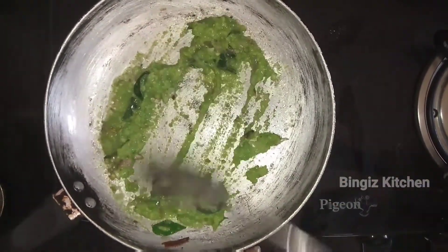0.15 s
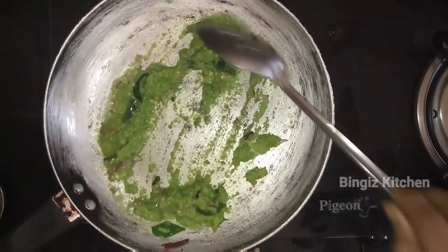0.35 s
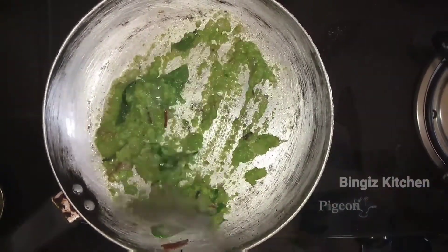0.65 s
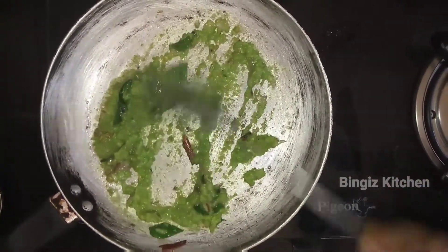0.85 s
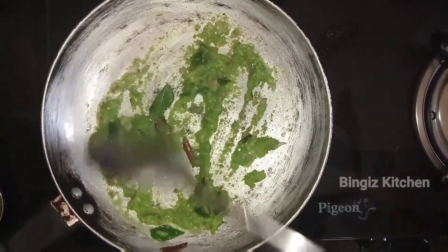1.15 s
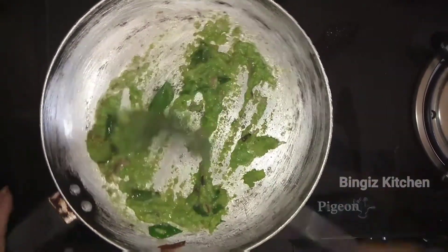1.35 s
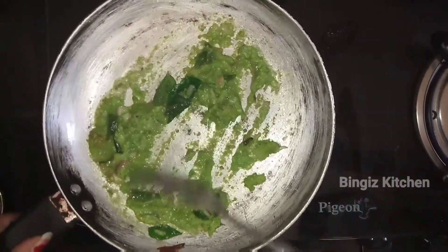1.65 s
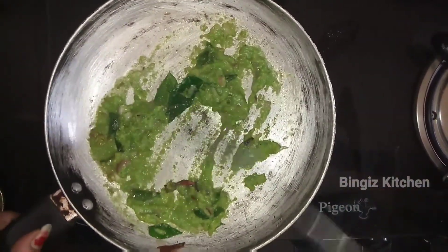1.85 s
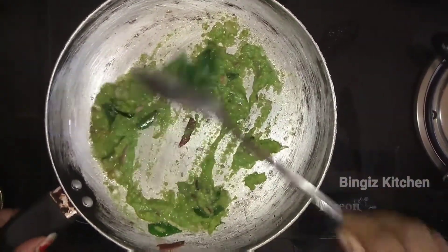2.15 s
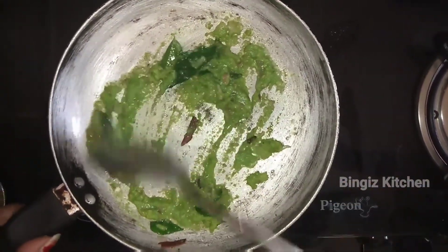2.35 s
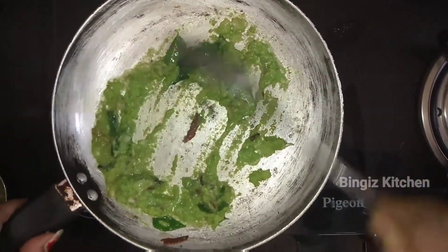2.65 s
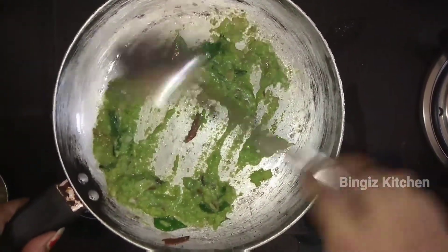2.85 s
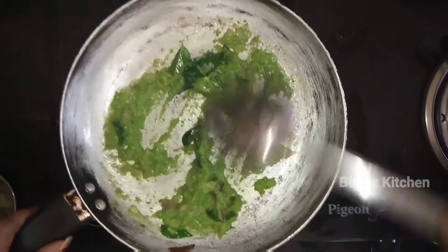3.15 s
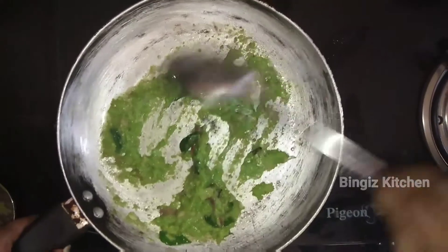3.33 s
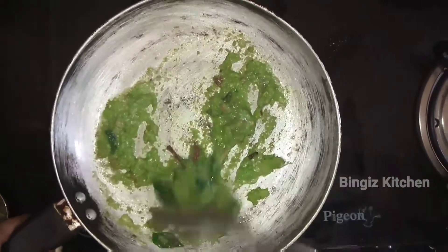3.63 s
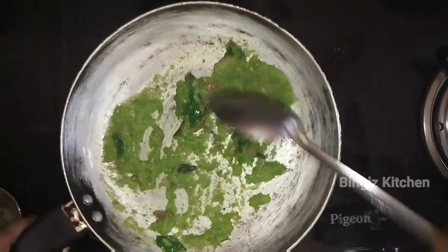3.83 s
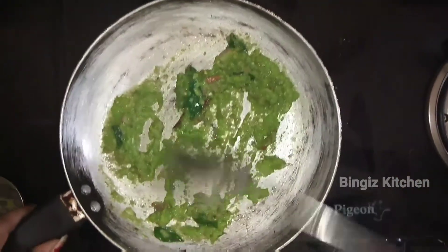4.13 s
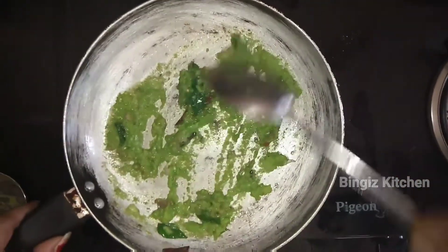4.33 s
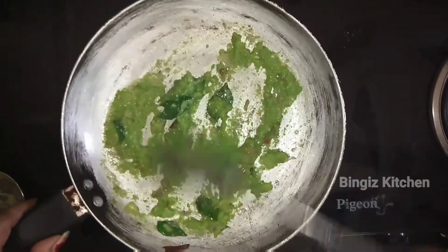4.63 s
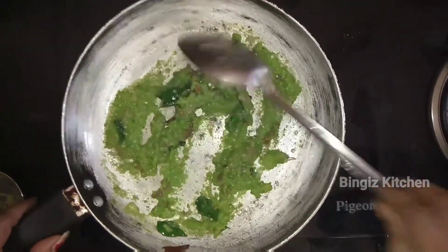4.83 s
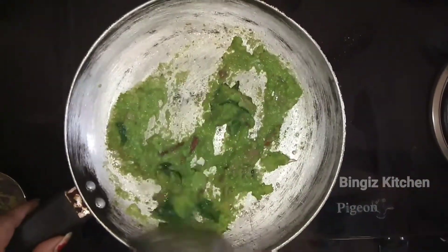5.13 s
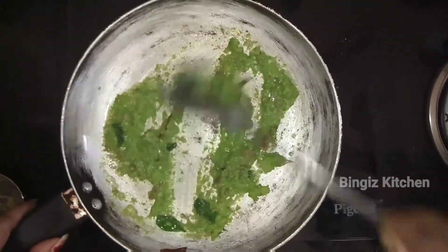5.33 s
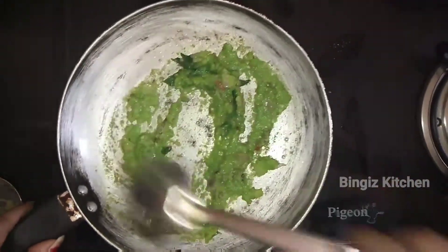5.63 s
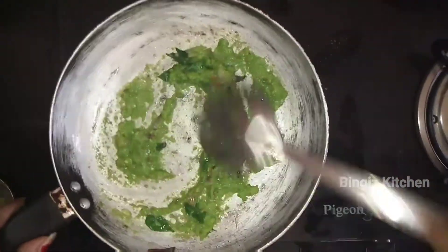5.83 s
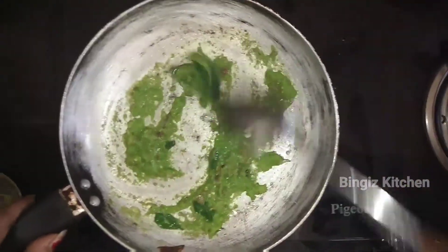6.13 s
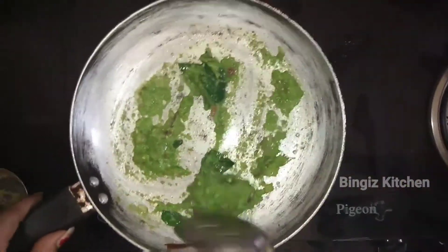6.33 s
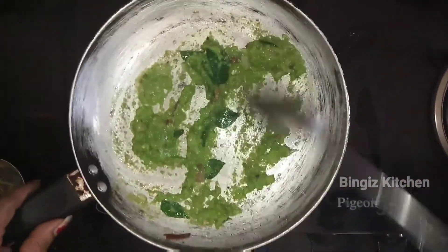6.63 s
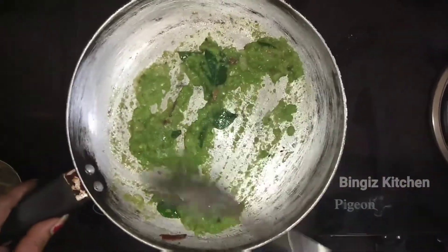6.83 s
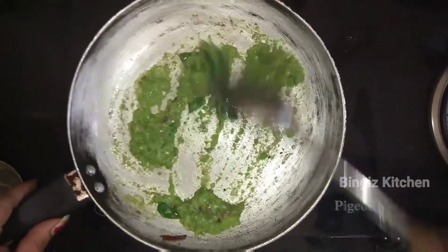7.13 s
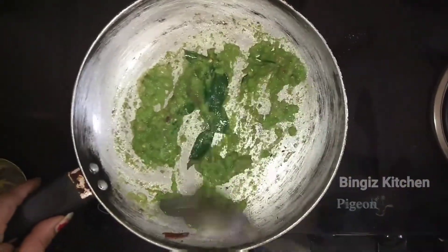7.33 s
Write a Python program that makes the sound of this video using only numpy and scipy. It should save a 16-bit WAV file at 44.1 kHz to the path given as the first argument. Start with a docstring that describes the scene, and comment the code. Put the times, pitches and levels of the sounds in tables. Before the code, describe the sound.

Close by in a quiet kitchen, a fine crackling sizzle runs throughout. Soft pan bumps and hollow little plops come first; then spoon knocks and rasping strokes arrive several times a second, unevenly, some sharp and clangy, others cushioned by paste. Scrapes grow longer and more ringing around three seconds and after five and a half. Low thuds accompany the contacts; stereo, nearly dry, with only slight room reflection.

```python
"""Paste sizzles softly throughout, over a low thud and a few plops; then a steel spoon stirs it, close by.
Three or four times a second the spoon knocks on the aluminium frying pan, chatters and drags across it.
Knocks and pushes ring damped pan modes and thud the pan on the stove; random slips make the scrapes;
bursts of noise and short chirps make the sizzle; decaying sines make the plops of air in the paste."""
import sys
import numpy as np
from scipy import signal
from scipy.fft import rfft, irfft, next_fast_len
from scipy.io import wavfile
from scipy.ndimage import uniform_filter1d

SR = 44100
rng = np.random.default_rng(int(sys.argv[2]) if len(sys.argv) > 2 else 0)


def dump(signal):
    """Clip the signal to [-1, 1] and save it as 16-bit WAV at the path in sys.argv[1]."""
    limited = np.clip(np.atleast_2d(signal).T, -1, 1)
    pcm = np.round(limited * 32767).astype(np.int16)
    wavfile.write(sys.argv[1], SR, pcm)


N = 329427
TIME = np.arange(N) / SR

# spoon knocks: start_s, strength_db, hardness_db_per_octave, clang_db (bowl, near 2 kHz),
# spit_db (squeezed paste), chatter_db (against first contact), thud_db (pan base), hum_db (pan bowl)
TAPS = [(0.634, -47, -15, 7, 0, -4, -53, -59), (0.763, -32.5, -14, -7, 0, 7, -27, -28.5),
        (0.819, -30.5, -5.5, 7, 7, -10, -30, -47), (1.0767, -19, -6.5, -2, 0, -24, -29.5, -40.5),
        (1.1268, -32.5, -3.5, 1, -14, -14, -52, -59), (1.3504, -18.5, -7, 6, 0, -30, -30, -30.5),
        (1.493, -46, -7, 6, 0, -8, -38, -52), (1.673, -26.5, -11.5, 11.5, -2, 0.5, -41.5, -33.5),
        (2.111, -48, -3.5, 12, 0, -8, -69, -76), (2.132, -45, 0.5, 6, 2, -12, -55, -72),
        (2.597, -36, -2, 6.5, -4, 7, -45, -44.5), (2.834, -17.5, -2.05, 0.5, 6, -3, -25, -35.5),
        (3.362, -17.5, 1.4, -3, -9, -10, -28.5, -36), (3.691, -32, -9, 0, 0, -6, -31, -36),
        (3.709, -39.5, -4.5, 12, 0, -11, -33.5, -39.5), (4.6637, -16, -3.5, 6.5, -5, -21, -30.5, -26.5),
        (4.754, -35, -16, 6, 0, -8, -54, -58), (4.9496, -18, -0.9, 3.5, -2, -17, -33, -35),
        (5.035, -31.5, -8.5, 5, 4, -27, -71, -48), (5.2387, -29.5, 3, 1, 2.5, -7, -67, -36.5),
        (5.5411, -18, -0.5, 0, -3.5, -18, -36, -34.5), (5.732, -41, 4, 4, -8, -12, -76, -63),
        (6.0788, -20, 0.4, 2.5, -4, -17.5, -33, -43.5), (6.4396, -19, -1.75, 1.5, -6.5, -10.5, -34, -25),
        (6.939, -38.5, 2, 2, -11, 3, -58, -48), (6.975, -45, 2, 7.5, 2, -16, -66, -68),
        (7.156, -41.5, -6, -7, 0, 4, -74, -72)]
# likeness of the two microphones: freq_hz, likeness (1 alike, negative opposed)
MIC_LIKENESS = [(100, 1.2), (330, 0.84), (700, 0.72), (1400, 0.5), (2500, -0.44), (15000, 0.5)]


def amp(db):
    """Decibels to gain."""
    return 10 ** (np.asarray(db) / 20)


def rms_one(x):
    """Scale to rms 1."""
    return x / np.sqrt(np.mean(x ** 2) + 1e-20)


def onset_one(x):
    """Scale so that the first 50 ms have standard deviation 1."""
    return x / np.std(x[:, :SR // 20])


def at_hz(points, hz):
    """Read a table on a log-frequency axis."""
    f, value = np.transpose(points)
    return np.interp(np.log(hz + 1e-3), np.log(f), value)


def gains_in_time(rows):
    """One gain curve for each dB column."""
    s, *columns = np.transpose(rows)
    return [amp(np.interp(TIME, s, c)) for c in columns]


def add(out, s, sound):
    """Mix a sound in at time s."""
    i = max(int(s * SR), 0)
    out[..., i:i + sound.shape[-1]] += sound[..., :N - i]


def through(x, response):
    """Convolve, keeping the length."""
    x = np.atleast_2d(x)
    return signal.fftconvolve(x, np.atleast_2d(response), axes=-1)[:, :x.shape[-1]]


def coloured(x, spectrum, size=2048):
    """Causal (minimum-phase) filter with the given spectrum."""
    level_db = at_hz(spectrum, np.fft.rfftfreq(size, 1 / SR))
    cepstrum = irfft(np.log(amp(level_db)))
    cepstrum[1:size // 2] *= 2
    cepstrum[size // 2 + 1:] = 0
    return through(x, irfft(np.exp(rfft(cepstrum))))


def diffuse(size):
    """Stereo white noise whose left-right likeness varies with frequency."""
    padded = next_fast_len(size)
    mid, side = rfft(rng.standard_normal((2, padded)))
    alike = np.clip(at_hz(MIC_LIKENESS, np.fft.rfftfreq(padded, 1 / SR)), -.99, .99)
    stereo = np.sqrt(1 + alike) * mid + np.sqrt(1 - alike) * side * [[1], [-1]]
    return rms_one(irfft(stereo, padded)[:, :size])


def dying_noise(t60, size):
    """A dense decaying response of unit energy."""
    return rms_one(diffuse(size) * amp(-60 * TIME[:size] / t60)) / np.sqrt(size)


def drift(rate):
    """Smooth random wandering, rate knots a second, rms 1."""
    knots = rng.standard_normal(4096)
    return rms_one(np.interp(TIME * rate, np.arange(len(knots)), knots))


def grains(per_s, spread_db, size):
    """Random clicks of uneven size and sign, rms 1."""
    sizes = amp(spread_db * np.minimum(rng.exponential(1, size), 4)) * rng.choice([-1, 1], size)
    return rms_one(sizes * (rng.random(size) < per_s / SR))


def crackle(per_s, spread_db, flutter_db, burst_s=0.0017):
    """Tiny bubbles burst at random, each a spit of noise that dies within milliseconds."""
    bursts = grains(per_s, spread_db, N) ** 2 + 1e-18
    energy = signal.lfilter([1], [1, -np.exp(-1 / (burst_s * SR))], bursts)
    return diffuse(N) * np.sqrt(energy) * amp(flutter_db * drift(40))


def sizzling(bubbling_db, spray_db, chirps_db):
    """Frying: crackle from thousands of bursts a second, and bubbles that ring briefly at 40 pitches."""
    # frying activity: time_s, bubbling_db, spray_db
    activity = [(0, -46.5, -50), (1.0, -47, -52), (1.7, -45.5, -50.5), (2.24, -45, -52.5),
                (2.45, -41.5, -50.5), (2.75, -42, -47), (3.26, -45, -47), (3.7, -46, -50),
                (4.55, -47.5, -51), (5.15, -46, -49.5), (5.5, -47.5, -50), (5.95, -50, -54),
                (6.64, -50.5, -56), (6.85, -46, -51), (7.1, -50, -49), (7.47, -51.5, -54.5)]
    # bubbling colour: freq_hz, level_db (per Hz)
    bubbling_colour = [(500, -11), (1050, -4.5), (1700, -2), (2100, -1), (2580, 1.5), (2950, 0.5),
                       (3500, -2), (4200, 2.5), (4650, -6.5), (5300, -1.5), (6300, -3.5), (8200, -17),
                       (11000, -16.5)]
    # fine spray colour: freq_hz, level_db (per Hz)
    spray_colour = [(5000, -54), (8200, -23), (10000, -8), (12000, -6), (13200, -1.5), (14400, 0),
                    (15400, -0.5)]
    bubbling, spray = gains_in_time(activity)
    chirps = np.zeros((2, N))
    for hz in np.geomspace(1100, 5000, 40) * rng.uniform(.98, 1.02, 40):
        b, a = signal.iirpeak(hz, 45, fs=SR)
        chirp = rms_one(signal.lfilter(b, a, grains(40, 0.34, N) + 1e-18))
        chirps += chirp * np.sqrt(hz) * rng.choice([-1, 1], (2, 1))
    bubbles = rms_one(crackle(per_s=6000, spread_db=0.5, flutter_db=0.2))
    bubbles = bubbles + amp(chirps_db) * rms_one(chirps)
    fine = crackle(per_s=4900, spread_db=1.5, flutter_db=-1.2)
    return (amp(bubbling_db) * bubbling * rms_one(coloured(bubbles, bubbling_colour))
            + amp(spray_db) * spray * rms_one(coloured(fine, spray_colour)))


def pan_response(direct_db, wash_db, wash_t60, modes_db, size=12000):
    """Contact, a wash of crowded damped modes, and clear modes of strengths that vary with the spot touched."""
    # pan and spoon modes: freq_hz, height_db (over plain contact), t60_s, left_right_db
    pan_modes = [(540, 7, .17, -4), (581, 3, .14, -4), (720, 1, .13, -1), (787, 1, .11, -3),
                 (900, 2, .11, -2), (975, 1, .1, -4), (1078, 0, .09, -4), (1582, 7, .15, 4),
                 (1695, 4, .13, 3), (2040, 4, .12, 0), (2110, 3, .1, 1), (2214, 6, .1, 5),
                 (2445, 7, .13, 2), (2650, 4, .14, 0), (2970, 1, .08, 1), (3190, 5, .07, 2),
                 (3288, 7, .1, 2), (3499, 10, .08, 2), (3990, 3, .06, -3), (4270, 3, .05, 2),
                 (5300, 2, .03, -4), (5770, 0, .03, 0), (6795, 7, .07, 10)]
    t = TIME[:size]
    out = amp(wash_db) * dying_noise(wash_t60, size)
    out[0, 3] += amp(direct_db)
    out[1, 0] += amp(direct_db)   # right microphone 3 samples nearer
    for hz, db, t60, side_db in pan_modes:
        rate = np.log(1000) / t60
        height_db = modes_db + db + rng.normal(0, 3) + side_db / 2 * np.array([[1], [-1]])
        height = amp(height_db) * 2 * rate / SR
        unlike = 1 - at_hz(MIC_LIKENESS, hz)
        phase = rng.uniform(0, 2 * np.pi) + rng.normal(0, 1.92, (2, 1)) * unlike
        out += height * np.exp(-rate * t) * np.cos(2 * np.pi * hz * t + phase)
    return out


def shoves():
    """Every knock and every nudge shoves the pan: rows of (start_s, boom_db, thud_db, hum_db)."""
    # spoon pushes paste, pan shifts without a knock: start_s, thud_db (pan base), hum_db (pan bowl)
    nudges = [(0.002, -49.5, -56), (0.442, -37.5, -51.5), (2.041, -53, -44), (2.085, -48, -43),
              (2.321, -51.5, -52.5), (2.536, -38.5, -38), (2.712, -40.5, -49), (3.678, -32, -27.5),
              (3.928, -43, -71), (3.972, -48, -56.5), (4.077, -52, -63), (4.165, -45.5, -53),
              (4.372, -40.5, -63), (4.811, -51, -53), (5.245, -60, -34.5), (5.285, -42, -40.5),
              (6.578, -51, -48.5), (6.692, -37, -48), (6.865, -66, -47), (6.929, -51, -59),
              (7.148, -30, -44), (7.432, -46, -44)]
    # stove top booms along: level under a 0 dB thud, share of the thud's swing
    boom_db, boom_follows = -16, 0.78
    rows = [(s, thud_db, hum_db) for s, *_, thud_db, hum_db in TAPS + nudges]
    return [(s, boom_db + boom_follows * thud_db, thud_db, hum_db) for s, thud_db, hum_db in rows]


def thuds(level_db, rise_s, clunk_db, push_db, push_s, size=10000):
    """An uneven shove swells and fades around a short push; low pan and stove modes ring, the bowl clunks."""
    # pan on the stove: freq_hz, level_db, t60_s
    support_modes = [(58, -15, .25), (90, -11, .1), (121, 0, .22), (141, -11, .1), (182, -10, .08),
                     (243, -3, .09), (275, -9, .07), (311, 1, .22), (362, -15, .07)]
    # borders of boom, thud and hum: freq_hz
    part_edges_hz = [205, 285]
    # soft shove colour: freq_hz, level_db (per Hz)
    shove_colour = [(25, -24), (60, -15), (90, -12), (120, 0), (310, 0), (400, -6), (900, -14)]
    # dull clunk of the bowl: freq_hz, level_db (per Hz)
    clunk_colour = [(150, -11.5), (400, -8), (750, 0.5), (1500, -25), (4000, -35)]
    hum_lag_s = 0.00911   # the bowl's hum builds just after the shove
    out, t = np.zeros((2, N)), TIME[:size]
    bowl = pan_response(direct_db=8.5, wash_db=-2, wash_t60=0.032, modes_db=-15, size=size)
    bowl = coloured(bowl, clunk_colour)
    push = np.exp(-((t - rise_s) / push_s) ** 2)
    for s, *parts_db in shoves():
        shove = diffuse(size) * (t / rise_s) * np.exp(-t / rise_s) / np.sqrt(rise_s * SR)
        shove = coloured(shove + amp(push_db) * push / push.sum(), shove_colour)
        add(out, s, amp(parts_db[1] + clunk_db) * onset_one(through(shove, bowl)))
        for hz, mode_db, t60 in support_modes:
            r, w = amp(-60 / (t60 * SR)), 2 * np.pi * hz / SR
            ring = signal.lfilter([1, 0, -1], [1, -2 * r * np.cos(w), r * r], shove)
            part_db = parts_db[np.searchsorted(part_edges_hz, hz)]
            gain = amp(level_db + part_db + mode_db) * rng.choice([-1, 1])
            lag_s = hum_lag_s * (hz > part_edges_hz[-1])
            add(out, s + lag_s, gain * onset_one(ring))
    return out


def plops(opening_s, size=4000):
    """A pocket opens under the spoon and its air rings as a decaying sine."""
    # air pockets in the paste: start_s, pitch_hz, level_db (before the opening ramp), t60_s
    pockets = [(0.129, 760, -35.5, 0.056), (0.140, 620, -37, 0.069), (0.168, 493, -36, 0.032),
               (0.634, 876, -39, 0.088), (2.342, 767, -43, 0.083), (2.3645, 790, -26, 0.045),
               (4.208, 746, -31, 0.089)]
    out, t = np.zeros(N), TIME[:size]
    for s, hz, db, t60 in pockets:
        envelope = amp(db - 60 * t / t60) * (1 - np.exp(-t / opening_s))
        add(out, s, envelope * np.sin(2 * np.pi * hz * t))
    return out


def voiced(hit, hardness, clang_db, spit_db, size=1100):
    """Bare metal tilts a hit to the treble, paste to the bass; register levels are set over 25 ms."""
    # registers of a knock: low_hz, high_hz
    tap_bands = [(450, 1600), (1600, 2700), (2700, 4500), (4500, 8000), (8000, 15500)]
    # answer of each register: level_db (middling hardness), hardness_leverage_octaves
    tap_registers = [(-0.5, 0), (-4, 1.37), (-2.5, 2.08), (-4.5, 2.5), (-9, 3)]
    register_tilt = 0.49   # share of hardness that also tilts each register within itself
    power = np.mean(np.abs(rfft(hit[:, :size], 4 * size)) ** 2, axis=0) / (2 * size ** 2)
    hz = np.fft.rfftfreq(4 * size, 1 / SR)
    plain_db, octaves = np.transpose(tap_registers)
    levels_db = plain_db + hardness * octaves + [0, clang_db, 0, 0, spit_db]
    colour = []
    for (lo, hi), db in zip(tap_bands, levels_db):
        gain_db = db - 10 * np.log10(power[(hz > lo) & (hz < hi)].sum())
        for edge in (lo * 1.08, hi / 1.08):
            tilt_db = register_tilt * hardness * np.log2(edge / np.sqrt(lo * hi))
            colour.append((edge, gain_db + tilt_db))
    return coloured(hit, colour)


def taps(level_db, chatter_db, chatter_t60, contact_hz, size=12000):
    """A solid contact, cushioned by paste, while the spoon's edge buzzes brightly on the metal and dies away."""
    ring_follows = 0.33   # cushioned knocks ring less: dB of ring per dB per octave of hardness
    out = np.zeros((2, N))
    # contact colour: freq_hz, level_db
    contact = [(60, -42.5), (200, -7.5), (420, -5.5), (650, 4.5), (1000, 6.5), (1500, 1.5),
               (2200, 13.5), (2900, 4.0), (4200, 4.0), (4800, -3.5), (5900, -1.0), (7200, -14),
               (8200, -9.5), (10000, 1.5), (15000, 1.5)]
    lowpass = signal.butter(2, min(contact_hz, 15000), fs=SR, output="sos")
    knock = signal.sosfilt(lowpass, np.eye(1, size)[0])
    for s, strength_db, hardness, clang_db, spit_db, buzz_db, *_ in TAPS:
        buzz = grains(3000, 6.3, size) * amp(-60 * TIME[:size] / chatter_t60)
        buzz = buzz / np.sqrt(np.sum(buzz ** 2))
        buzz = coloured(buzz, [(600, -1.0), (1500, -7.5), (3500, 1.0)])
        ring_db = ring_follows * min(hardness, 0)
        pan = pan_response(direct_db=4.5, wash_db=1.0 + ring_db / 2, wash_t60=0.11, modes_db=4.0 + ring_db)
        hit = through(amp(buzz_db + chatter_db) * buzz - knock, pan)
        hit = voiced(coloured(hit, contact), hardness, clang_db, spit_db)
        add(out, s, amp(level_db + strength_db) * hit)
    # a small pan radiates little bass
    return signal.sosfilt(signal.butter(2, 150, "high", fs=SR, output="sos"), out)


def stroke_gains():
    """Strokes bite in, hold as pressure rises or eases, lift off; gains of grinding, rasp, hiss, singing."""
    # spoon drags: start_s, length_s, bite_time_constant_s, grind_db, rasp_db, smear_db (paste hiss),
    # sing_db (pan), pressure_rise_db_per_s
    strokes = [(0.816, 0.03, 0.013, -45, -41, -55, -60, 50), (1.077, 0.059, 0.01, -47, -49, -59, -64, 0),
               (1.393, .04, 0.017, -38.5, -32.5, -48, -49, 2),
               (1.678, 0.011, 0.0037, -34, -53, -71, -62, 0),
               (1.776, 0.059, 0.024, -39.5, -30.5, -47, -45, -66),
               (2.112, 0.03, 0.007, -54, -31.5, -48, -51, 0), (2.622, 0.014, .01, -58, -35, -46.5, -48, 0),
               (2.832, 0.038, 0.0054, -40, -36.5, -47, -50, -100),
               (2.9, .18, .008, -30, -42.5, -51, -36, 5), (3.044, 0.018, .012, -38, -34, -63, -31, 0),
               (3.097, 0.062, .0069, -49, -35.5, -50.5, -46, 62),
               (3.371, 0.12, 0.0085, -32.5, -31, -63, -35, -19),
               (3.702, 0.021, .009, -34.5, -53, -73, -46, 0),
               (4.173, 0.035, 0.0043, -42, -34.5, -48.5, -57, -52),
               (4.675, .11, 0.0076, -36, -38.5, -60, -52, -130),
               (4.965, 0.1, .01, -33.5, -32, -52, -52, -160),
               (5.282, 0.053, 0.011, -42.5, -31, -48, -50, 0),
               (5.559, 0.12, 0.011, -32, -32, -47.5, -29, 16), (5.696, 0.051, .01, -37, -34.5, -56, -34, 0),
               (5.766, 0.079, .013, -45, -32, -40.5, -43, 20),
               (6.073, 0.081, 0.0048, -36.5, -33.5, -47, -32, -140),
               (6.17, .065, .035, -34.5, -31.5, -49, -35, 25),
               (6.44, 0.14, 0.0038, -41.5, -44, -74, -58, -110),
               (6.94, 0.032, 0.0023, -49.5, -34.5, -46, -62, -80)]
    lift_s = 0.014   # time constant of lifting off
    power = np.zeros((4, N))
    for s, length, bite_s, *levels_db, rise_db_per_s in strokes:
        near = slice(max(int((s - .1) * SR), 0), int((s + length + .15) * SR))
        t = TIME[near] - s
        contact = np.exp(np.minimum(t, 0) / bite_s - np.maximum(t - length, 0) / lift_s)
        pressure = amp(rise_db_per_s * (np.clip(t, 0, length) - length / 2))
        power[:, near] += np.outer(amp(levels_db), contact * pressure) ** 2
    return np.sqrt(power)


def travelling(slips, spots, per_s):
    """The spoon moves on, so one spot of the pan after another takes over the ringing."""
    weights = np.array([amp(7.6 * drift(per_s)) for _ in spots])
    weights /= np.sqrt(np.sum(weights ** 2, axis=0))
    return sum(through(slips * weight, spot) for weight, spot in zip(weights, spots))


def shifting(x, depth_db, size=512):
    """The spoon's angle and the paste under it keep changing, so the colour of a scrape flickers."""
    frames = signal.stft(x, nperseg=size)[2]
    patches = rng.standard_normal(frames.shape[1:])
    patches = uniform_filter1d(patches, size=4, axis=0)   # over frequency
    patches = uniform_filter1d(patches, size=5, axis=1)   # over time
    return signal.istft(frames * amp(depth_db * rms_one(patches)), nperseg=size)[1][:, :N]


def singing(noise):
    """Scraping noise keeps a few of the pan's modes ringing, each a little differently at the microphones."""
    # modes that a steady scrape sustains: freq_hz, width_hz, level_db
    singing_modes = [(550, 40, -7), (950, 90, -4), (1580, 70, -10), (3220, 130, -7), (3500, 75, 0)]
    modes = []
    for hz, width, db in singing_modes:
        b, a = signal.iirpeak(hz, hz / width, fs=SR)
        modes.append(amp(db) * rms_one(signal.lfilter(b, a, noise)))
    return rms_one(sum(modes))


def scraping(grind_db, rasp_db, smear_db, sing_db):
    """Stick and slip: coarse slips grind, fine ones rasp; crackling smeared paste hisses and the pan sings."""
    # coarse grinding colour: freq_hz, level_db (per Hz)
    grind_colour = [(30, -62), (200, -21.5), (400, -24), (560, -11.5), (700, -6.5), (930, 1), (1300, -6.5),
                    (1900, -15), (3000, -24.5), (6000, -35)]
    # metal rasp colour: freq_hz, level_db (per Hz)
    rasp_colour = [(700, -24), (1750, -12), (2100, 0), (2500, 0), (2870, -8.5), (3450, -1.5), (3750, -7),
                   (4200, -4), (4700, -13), (5300, -12), (5750, -7.5), (6200, -14), (7000, -14),
                   (8300, -28), (12000, -36)]
    # paste hiss colour: freq_hz, level_db (per Hz)
    smear_colour = [(4000, -58), (7150, 4), (8300, -19), (8900, -7), (9400, -9), (9900, 1), (10750, -6),
                    (11500, 7), (12700, -4), (13900, 5), (15400, 2)]
    grind, rasp, smear, sing = stroke_gains()
    spots = [pan_response(direct_db=-6, wash_db=-2, wash_t60=0.04, modes_db=1) for _ in range(6)]
    coarse = travelling(grains(1100, 3.2, N) * amp(2 * drift(150)), spots, per_s=22)
    fine = travelling(grains(1500, 3.2, N) * amp(2 * drift(180)), spots, per_s=22)
    wet = crackle(per_s=8000, spread_db=2.5, flutter_db=2.5)
    scrape = amp(grind_db) * grind * rms_one(coloured(coarse, grind_colour))
    scrape = scrape + amp(rasp_db) * rasp * rms_one(coloured(fine, rasp_colour))
    scrape = scrape + amp(smear_db) * smear * rms_one(coloured(wet, smear_colour))
    return shifting(scrape, depth_db=2) + amp(sing_db) * sing * singing(wet)


def kitchen(x, wet_db, t60_s=0.39, size=20000):
    """A short, dull tail from the walls, 10 ms late."""
    tail = np.pad(dying_noise(t60_s, size), ((0, 0), (SR // 100, 0)))
    return x + amp(wet_db) * through(x, coloured(tail, [(300, 8.0), (2000, -4.0), (10000, -1)]))


def scene():
    """Spoon and pan in the room, over the sizzle and a faint low room tone."""
    # room tone colour: freq_hz, level_db (per Hz)
    room_colour = [(20, -34), (50, 3.5), (120, 3), (300, -7), (500, -8.5), (1000, -5.5), (2000, -23),
                   (6000, -25.5)]
    knocks = taps(level_db=-1.5, chatter_db=9.0, chatter_t60=0.087, contact_hz=2900)
    scrapes = scraping(grind_db=1.0, rasp_db=-0.5, smear_db=7.0, sing_db=-5.0)
    stove = thuds(level_db=-2.0, rise_s=0.00457, clunk_db=-10.5, push_db=-3, push_s=0.00059)
    room_tone = amp(-59.0) * rms_one(coloured(diffuse(N), room_colour))
    frying = sizzling(bubbling_db=-2.5, spray_db=1.0, chirps_db=-7.5)
    stirring = knocks + scrapes + stove + plops(opening_s=0.0011)
    return kitchen(stirring, wet_db=-16.5) + frying + room_tone


def record(dry):
    """The left microphone is the brighter one; peaks are rounded and the top is cut."""
    # balance of the two microphones: freq_hz, left_right_db
    mic_balance = [(300, 0), (600, -2), (1200, -1), (1700, 7), (2300, 5.5), (3200, 3.5), (4300, -1),
                   (5900, 1), (7500, 11.5), (10000, 5.5), (12500, 4), (15000, 10.5)]
    cutoff_hz, top = 15600, .95   # top: full-scale limit of the rounding
    sides = []
    for x, sign in zip(dry, (1, -1)):
        sides.append(coloured(x, [(hz, sign * db / 2) for hz, db in mic_balance]))
    rounded = top * np.tanh(np.vstack(sides) / top)
    return signal.sosfilt(signal.ellip(12, .1, 80, cutoff_hz, fs=SR, output="sos"), rounded)


dry = scene()
out = record(dry)
dump(out)
```